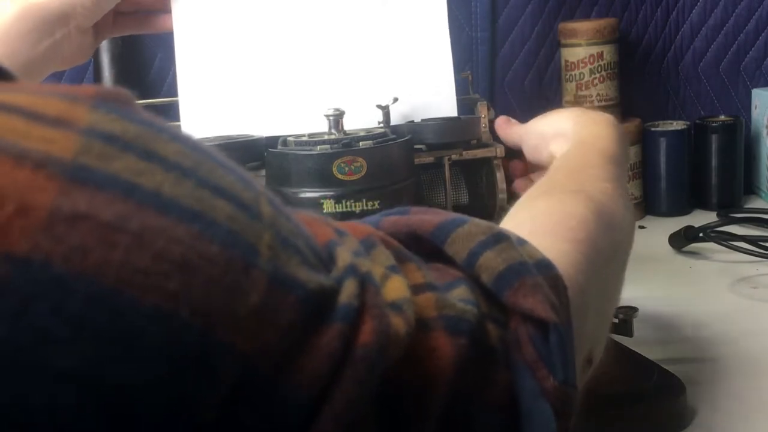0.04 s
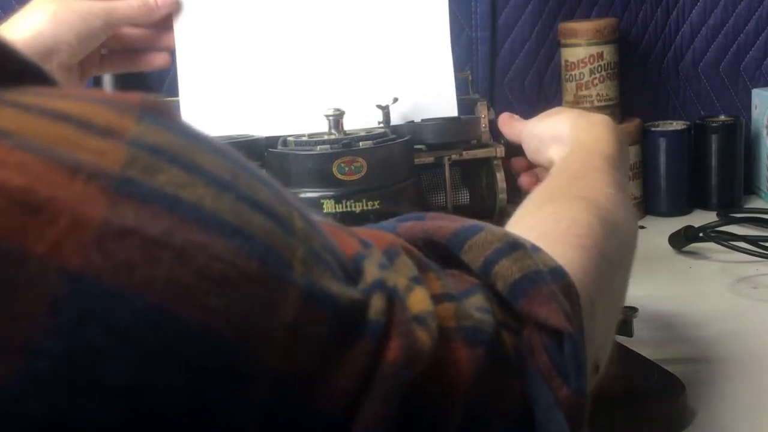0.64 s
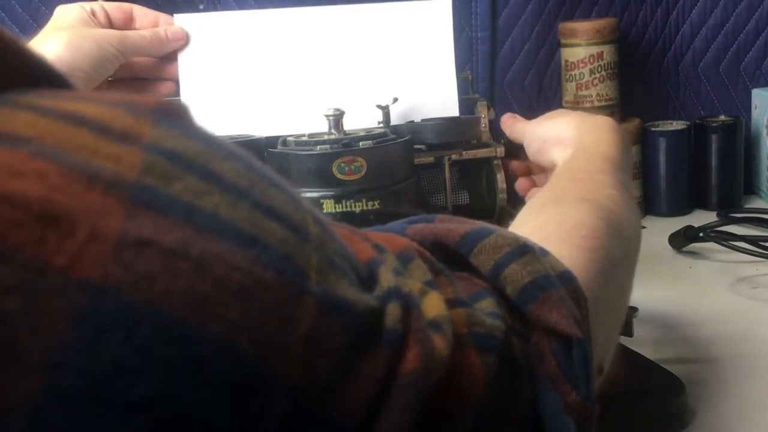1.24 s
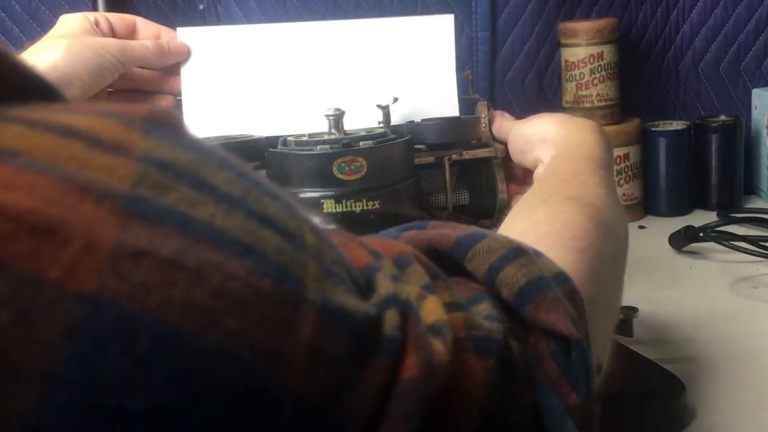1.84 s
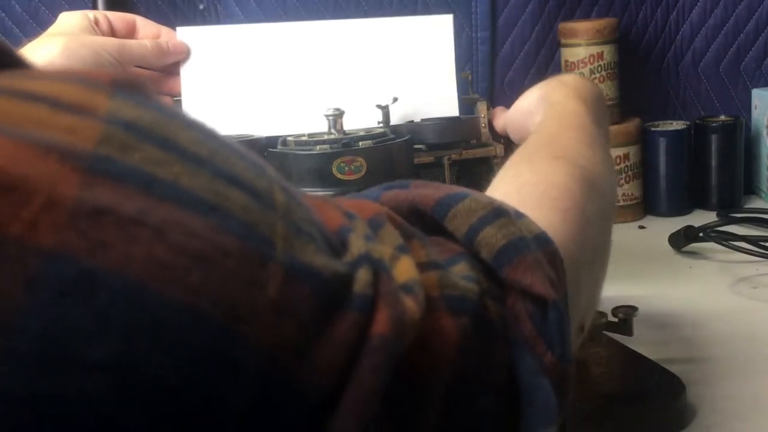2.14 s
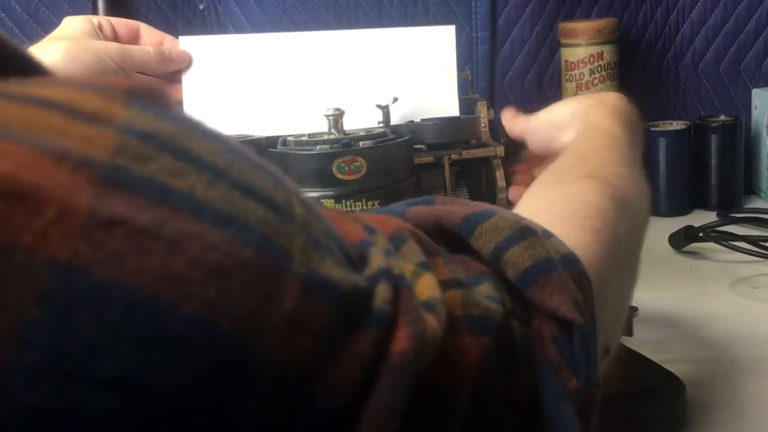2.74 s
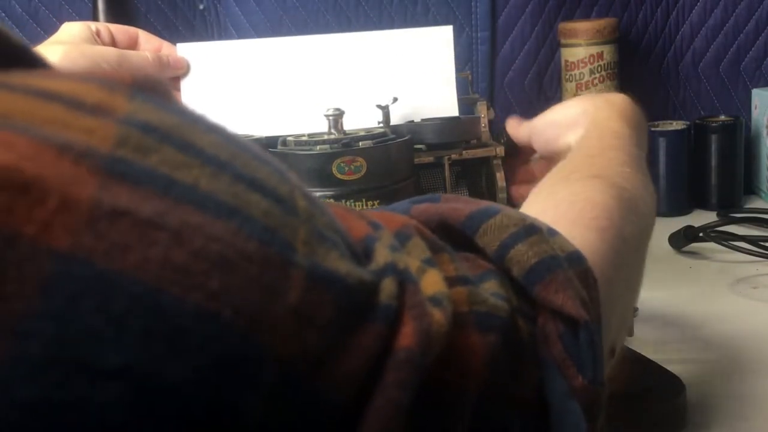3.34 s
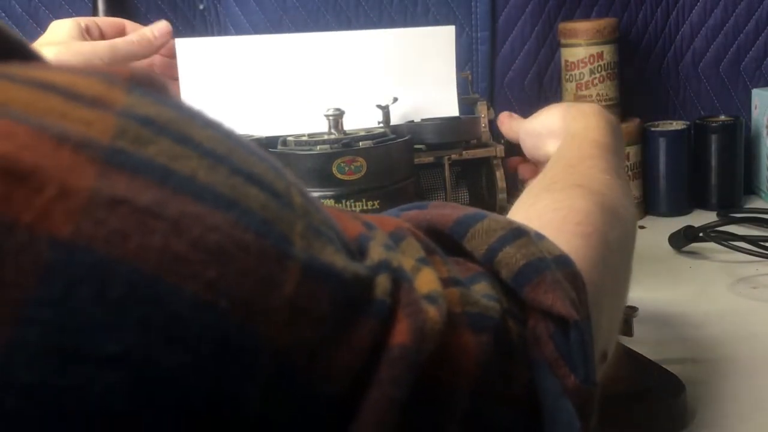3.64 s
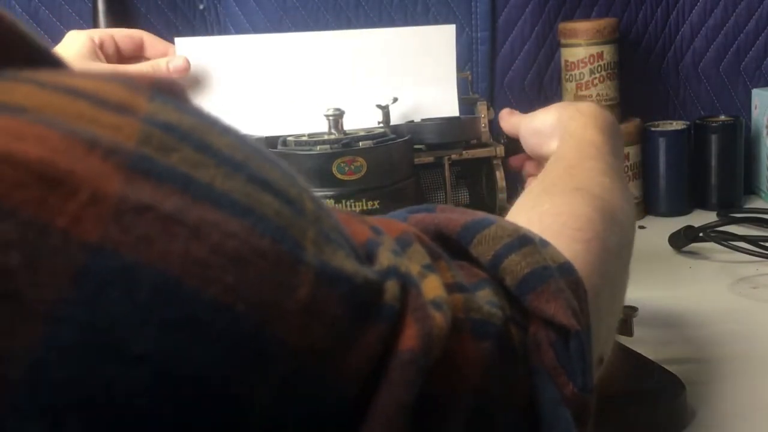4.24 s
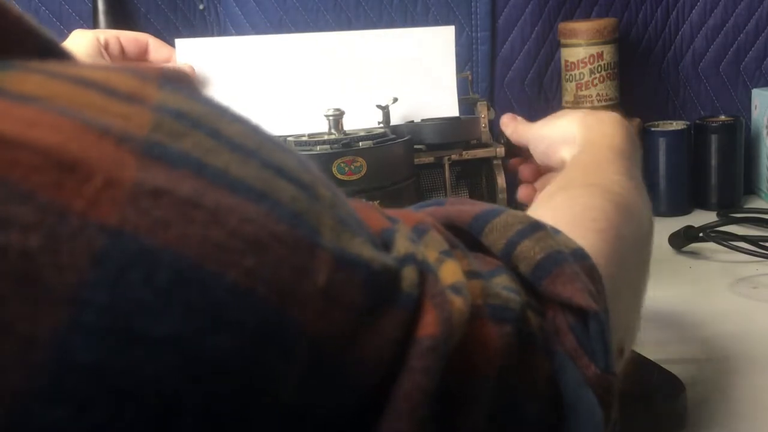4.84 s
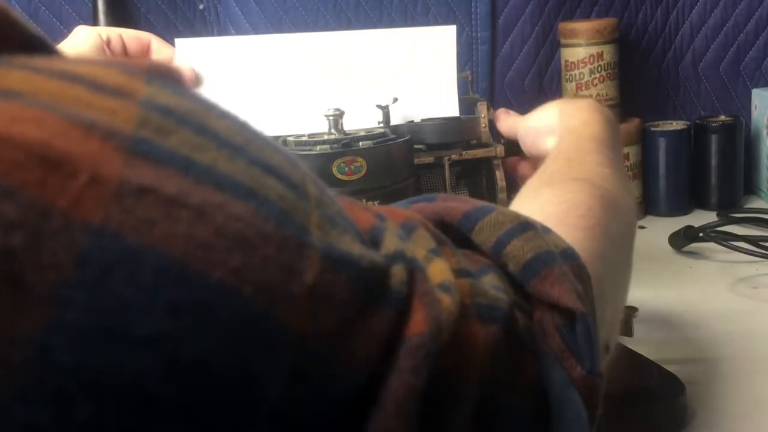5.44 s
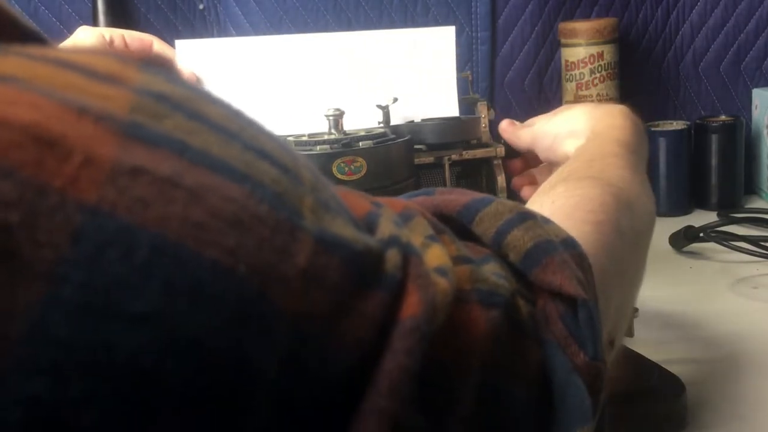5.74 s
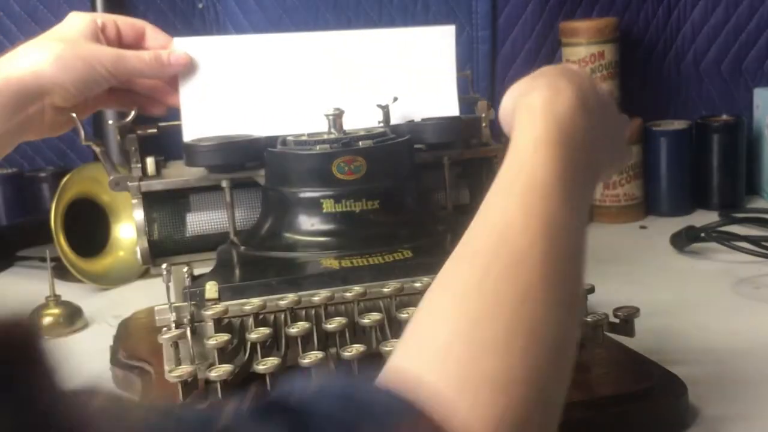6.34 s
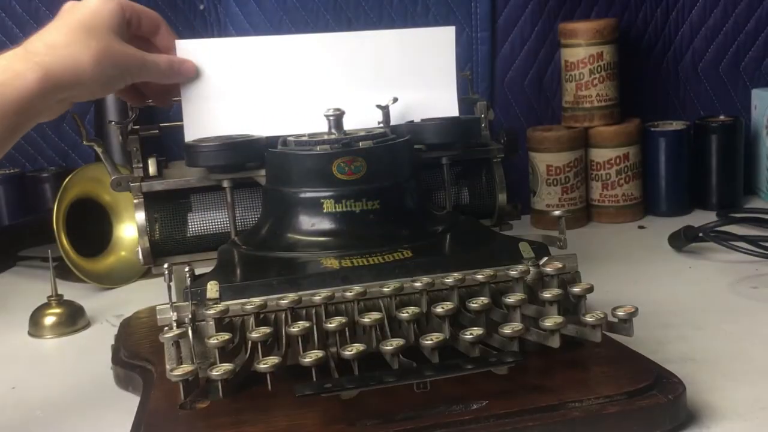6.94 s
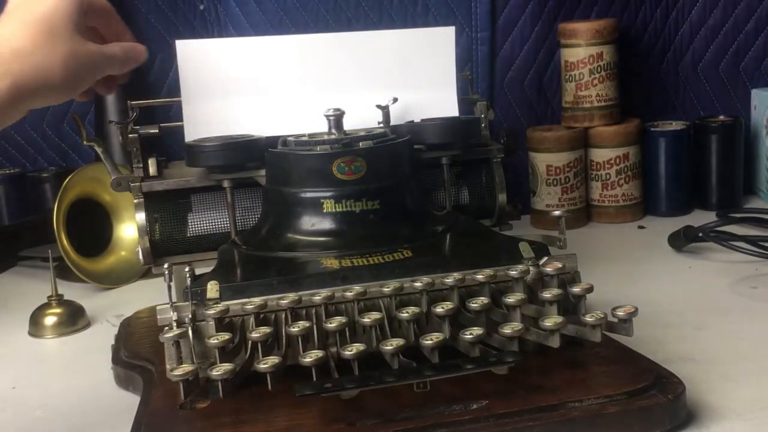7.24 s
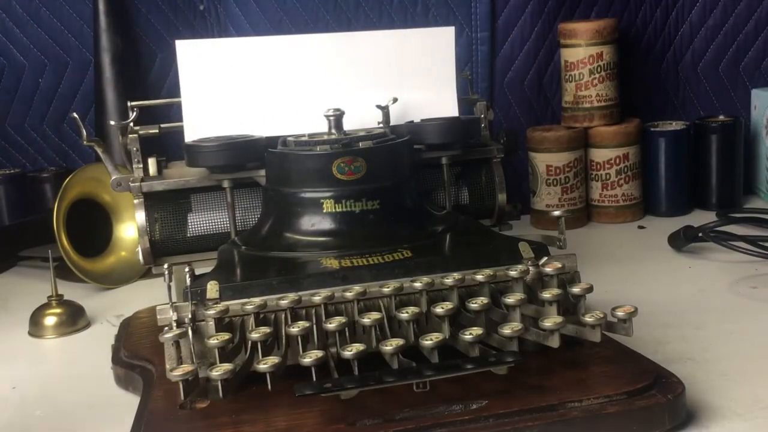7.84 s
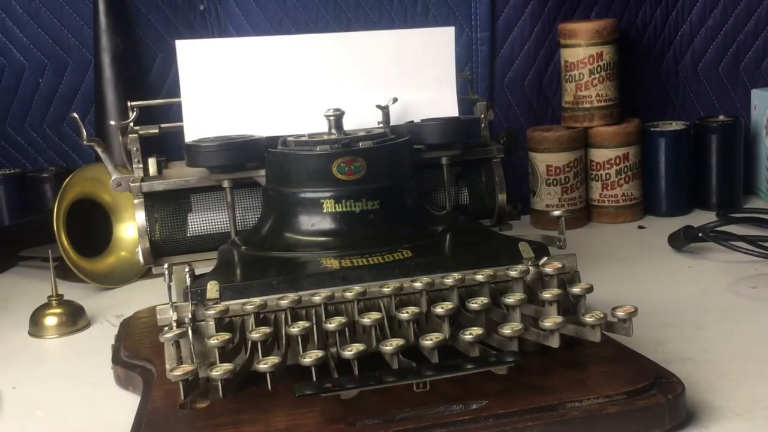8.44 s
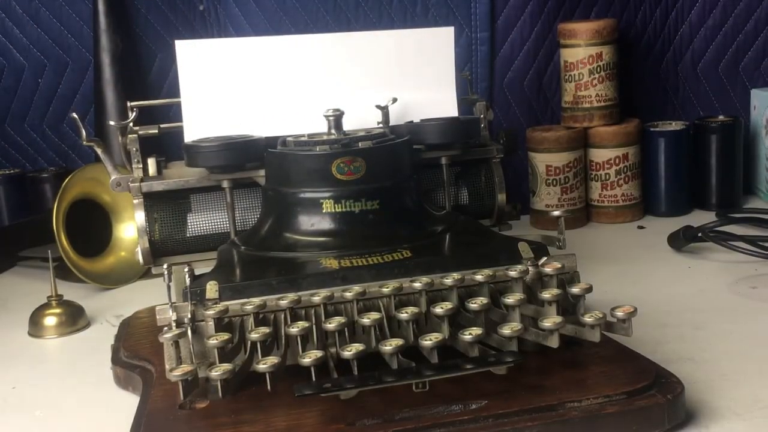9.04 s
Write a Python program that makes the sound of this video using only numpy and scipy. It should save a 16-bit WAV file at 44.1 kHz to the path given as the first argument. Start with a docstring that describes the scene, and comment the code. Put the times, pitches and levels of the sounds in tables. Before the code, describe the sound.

A hand winds paper into an old typewriter with short twists of the roller knob. Each twist gives a quick run of ratchet clicks, a little paper scrape and clacks from the loose metal carriage. After about six seconds the turning stops, fingers slide softly off the sheet, and a few dull table bumps, a small click and a tiny squeak follow. The sound is close, in a small padded room with faint hiss.

```python
"""Winding paper into a typewriter

In a small padded room a hand feeds a sheet into an old typewriter with short twists of the platen knob.
The sprung detent scrapes up each ratchet tooth and snaps down, the platen rumbles and the loose carriage
clacks: friction and impacts excite the resonances of metal parts, frame and wooden base. Afterwards
fingers slide off the paper, a sleeve swishes, something bumps the table and there is one tiny squeak."""
import sys
import numpy as np
from scipy import signal
from scipy.fft import rfft, irfft, next_fast_len
from scipy.io import wavfile
from scipy.ndimage import uniform_filter1d, map_coordinates

SR = 44100
rng = np.random.default_rng(int(sys.argv[2]) if len(sys.argv) > 2 else 0)


def digitize_waveform(pressure):
    """Quantize a signal to 16-bit integers and store it at the path in sys.argv[1].

    Rows of a 2-D input are taken as channels; values are limited to [-1, 1].
    """
    field = np.atleast_2d(pressure).T
    bounded = np.clip(field, -1, 1)
    quanta = np.round(bounded * 32767).astype(np.int16)
    wavfile.write(sys.argv[1], SR, quanta)


N = 404838
LET_GO_S = 6.1  # the hand leaves the knob

# Twists of the knob. Each row: start and end in seconds, then relative levels in dB of the rolling,
# the paper scrape, the wooden base and the detent's ping (higher when it drops freely).
TWISTS = [(0.0, 0.151, -46.5, -48, -53, 6.5), (0.542, 0.84, -54.5, -55.5, -58, 16),
          (1.214, 1.41, -49.5, -53, -52.5, 10.5), (1.816, 1.905, -42.5, -49.5, -43, 2.5),
          (2.399, 2.627, -47, -57, -49, 2), (3.044, 3.28, -44.5, -54, -50, 0.5),
          (3.679, 3.906, -46.5, -54.5, -72, 3.5), (4.564, 4.64, -42, -49.5, -52, -10),
          (4.79, 5.096, -44.5, -53, -54, 2.5), (5.517, 5.686, -49.5, -54, -63, 3.5),
          (5.755, 5.89, -52, -61, -65, 4.5)]
# Spectrum of scraping contact. Each row: frequency in Hz, relative level in dB.
SCRAPE = [(600, -8.5), (1200, 6), (2000, 6.5), (3300, 4), (4100, 2.5), (5300, 3), (7200, -1), (8700, -0.5),
          (10000, -3.5), (12000, -7), (16000, -11.5)]
# Resonances of the machine. Each row: frequency in Hz, bandwidth in Hz, relative level in dB.
FRAME_MODES = [(220, 130, -9.5), (350, 35, -7.5), (450, 61, -2.5), (624, 44, -5), (706, 54, -14),
               (758, 99, 5), (872, 92, 3), (970, 86, 0.5), (1124, 86, 2), (1330, 52, 0.5), (1420, 44, -4.5),
               (1720, 98, -6.5), (1990, 30, -10), (2070, 33, -4.5), (2210, 120, -8), (2560, 28, -14),
               (3250, 54, -10)]  # carriage frame
LINK_MODES = [(1326, 105, 1.5), (1597, 50, 4), (1873, 70, 1.5), (2060, 92, 5), (2290, 92, 1.5),
              (2610, 66, 0), (3130, 145, -1.5), (3570, 420, -8), (4550, 150, -3.5), (5400, 260, -9.5),
              (5800, 160, -11), (6400, 180, -20)]  # loose metal links
BASE_MODES = [(206.6, 36, 2), (259, 27, -1), (327, 64, -5.5), (452, 54, -10.5)]  # wooden base


def amp(db):
    """Amplitude ratio of a level in decibels."""
    return 10 ** (np.asarray(db) / 20)


def unit(x):
    """Normalisation to an rms of 1."""
    return x / np.sqrt(np.mean(np.abs(x) ** 2) + 1e-20)


def along(points, hz):
    """Interpolation of (Hz, value) points on a logarithmic frequency axis."""
    frequencies, values = np.transpose(points)
    return np.interp(np.log(hz + 1), np.log(frequencies + 1), values)


def curves(rows):
    """Linear interpolation in time: one curve for each column after the first."""
    times, *columns = np.transpose(rows)
    return [np.interp(np.arange(N) / SR, times, column) for column in columns]


def during(rows):
    """A soft-edged gate over the time that a table covers."""
    t = np.arange(N) / SR
    return uniform_filter1d(1.0 * ((t >= rows[0][0]) & (t <= rows[-1][0])), size=1500)


def turning():
    """One soft-edged gate for each twist of the knob."""
    t = np.arange(N) / SR
    start, end, *_ = np.transpose(TWISTS)
    return uniform_filter1d(1.0 * ((t >= start[:, None]) & (t < end[:, None])), size=600)


def wobble(rate):
    """Random modulation: a spline through rate knots a second."""
    return map_coordinates(rng.standard_normal(int(N * rate / SR) + 4), [np.arange(N) * rate / SR])


def coloured(x, gain):
    """Minimum-phase filtering: folding the cepstrum makes gain(hz) a causal filter of unit power."""
    size = 32768
    magnitude = unit(gain(np.fft.rfftfreq(size, 1 / SR)))
    cepstrum = irfft(np.log(np.maximum(magnitude, 1e-6)))
    cepstrum[1:size // 2] *= 2
    cepstrum[size // 2 + 1:] = 0
    response = irfft(np.exp(rfft(cepstrum)))[:size // 2]
    return signal.oaconvolve(x, response)[:N]


def shaped(x, spectrum):
    """Spectral shaping by an envelope of (Hz, dB) points."""
    return coloured(x, lambda hz: amp(along(spectrum, hz)))


def resonant(force, modes, broad_db):
    """Forced vibration: (Hz, bandwidth, dB) resonances add in power to the wooden base's broad response."""
    # Broad response of the wood. Each row: frequency in Hz, relative level in dB.
    board = [(60, -38), (150, 1), (450, 6.5), (800, 8), (1300, 4.5), (2500, -37), (4000, -34),
             (9000, -17.5), (16000, -26)]

    def gain(hz):
        peaks = sum(amp(db) ** 2 / (1 + ((centre ** 2 - hz ** 2) / (hz * width + 1)) ** 2)
                    for centre, width, db in modes)
        broad = amp(broad_db + along(board, hz)) ** 2
        return np.sqrt(peaks / (1 + (hz / 9000) ** 2) + broad)
    return coloured(force, gain)


def grit(rate, grain_db):
    """Friction as shot noise: rate micro-impacts a second, of uneven size, with an rms of 1."""
    hits = rng.random(N) < rate / SR
    return unit(hits * rng.choice([-1, 1], N) * amp(grain_db * rng.standard_normal(N)))


def chatter(times, levels_db, rise, t60, rate):
    """Rough contact: bursts of rate micro-impacts a second swell 60 dB in rise seconds and die in t60."""
    lead = SR // 4
    power = np.zeros(N + SR)
    t = np.arange(-lead, SR // 2) / SR
    burst = amp(-60 * np.where(t < 0, -t / rise, t / t60)) ** 2
    for start, db in zip(times, levels_db):
        power[round(start * SR):][:len(t)] += amp(db) ** 2 * burst
    count = int(N * rate / SR)
    hits = np.unique(((np.arange(count) + rng.random(count)) * N / count).astype(int))
    # each impact releases the energy gathered since the one before
    energy = np.diff(np.cumsum(power[lead:])[hits], prepend=0)
    force = np.zeros(N)
    force[hits] = np.sqrt(np.abs(energy)) * rng.choice([-1, 1], len(hits))
    return force


def strike(times, levels_db, gap_s, count, bounce_db=-2):
    """Inelastic rebound: each impact is followed by ever weaker ones, to and fro at uneven gaps."""
    force, order = np.zeros(N + SR), np.arange(count)
    for start, db in zip(times, levels_db):
        gaps = gap_s * (0.5 + rng.random(count)) * (order > 0)
        hits = np.round((start + np.cumsum(gaps)) * SR).astype(int)
        force[hits] += (-1) ** order * amp(db + bounce_db * order)
    return force[:N]


def background():
    """The noise floor: broadband room noise with a faint mains hum."""
    # Room noise. Each row: frequency in Hz, relative level in dB.
    air = [(13, -40), (22, -17), (34, -13.5), (56, 0), (92, -8.5), (128, -3.5), (270, -18.5), (328, -12.5),
           (444, -21.5), (554, -23.5), (710, -25.5), (771, -18.5), (885, -26), (5770, -35.5),
           (16000, -40.5)]
    hum = amp(-67) * np.sin(2 * np.pi * 120 * np.arange(N) / SR)
    return hum + amp(-62 + 0.99 * wobble(13)) * shaped(rng.standard_normal(N), air)


def sleeve():
    """Friction of cloth on cloth makes one swell of noise as the arm draws back."""
    # Cloth noise. Each row: frequency in Hz, relative level in dB.
    cloth = [(300, -25), (2000, -9), (6000, -2), (9000, 2), (15000, -5)]
    peak_s, rise_s, fall_s = 6.68, 0.5, 0.2
    t = np.arange(N) / SR - peak_s
    swell = np.exp(-(t / np.where(t < 0, rise_s, fall_s)) ** 2)
    return amp(-72.5) * swell * shaped(rng.standard_normal(N), cloth)


def squeak():
    """A thin gliding tone, roughened by random frequency modulation."""
    # Course of the squeak. Each row: time in seconds, pitch in Hz, level in dB.
    glide = [(9.09, 5300, -84), (9.125, 5800, -60), (9.145, 5000, -72), (9.178, 5650, -66)]
    hz, db = curves(glide)
    phase = 2 * np.pi * np.cumsum(hz * (1 + 0.0083 * wobble(500))) / SR
    return during(glide) * amp(db) * np.sin(phase)


def table_bumps():
    """Soft impacts excite mainly the lowest modes of the table."""
    # Bumps. Each row: time in seconds, relative level in dB, pitch in Hz.
    bumps = [(7.489, -32.5, 72), (8.239, -28, 81), (8.939, -34.5, 48)]
    # Their spectrum. Each row: multiple of the pitch, relative level in dB.
    thump = np.array([(.35, -11), (.7, -7), (1, -1), (1.5, -11.5), (2.4, -20.5), (5.5, -31.5),
                      (21, -54), (110, -95)])
    return sum(shaped(chatter([time], [db - 10.5], rise=0.059, t60=0.32, rate=2000), thump * [hz, 1])
               for time, db, hz in bumps)


def tap():
    """A small hard object clicks and settles by rebounds as the table is bumped."""
    # The click. Its row: time in seconds, relative level in dB.
    click = [(8.2589, -43.5)]
    # The object's resonances. Each row: frequency in Hz, bandwidth in Hz, relative level in dB.
    modes = [(1400, 290, -8), (1990, 150, 2.5), (2760, 300, -2), (3520, 310, -2.5), (4200, 290, -15),
             (6400, 440, -17)]
    times, db = np.transpose(click)
    hit = strike(times, db + 20, gap_s=0.0007, count=6)
    settling = chatter(times + 0.0011, db - 1, rise=0.002, t60=0.057, rate=4000)
    return resonant(hit + settling, modes, broad_db=-21)


def dry_ticks():
    """Broadband transients heard as thin dry ticks: the sheet flicking, and one at the squeak's peak."""
    # Ticks. Each row: time in seconds, relative level in dB.
    ticks = [(3.3443, -53), (3.492, -54.5), (7.048, -45), (9.1234, -55)]
    times, db = np.transpose(ticks)
    return shaped(chatter(times, db, rise=0.0009, t60=0.019, rate=4400), SCRAPE)


def paper():
    """Sliding friction of fingertips on the sheet."""
    # Course of the slide. Each row: time in seconds, relative level in dB.
    rub = [(6.1, -83), (6.124, -81), (6.4, -69.5), (6.698, -67), (6.806, -59), (7.092, -61.5), (7.172, -86),
           (7.25, -89)]
    # Rubbed paper. Each row: frequency in Hz, relative level in dB.
    spectrum = [(150, -12), (250, 0.5), (354, -4.5), (597, -7), (748, -10.5), (1530, -14), (1980, -5),
                (2910, -15), (4900, -19), (6940, -18.5), (7840, -27), (9330, -25), (14900, -36),
                (16000, -41)]
    rub_db, = curves(rub)
    envelope = during(rub) * amp(rub_db + 2.5 + 1.6 * wobble(25))
    return envelope * shaped(grit(rate=7000, grain_db=3), spectrum)


def hand_knocks():
    """Soft contact excites a few low, hollow resonances as the hand shifts."""
    # Knocks. Each row: time in seconds, relative level in dB.
    knocks = [(2.131, -48), (4.0278, -48), (6.1574, -55)]
    # Their resonances. Each row: frequency in Hz, bandwidth in Hz, relative level in dB.
    modes = [(787, 54, -1), (900, 60, 0.5), (1130, 80, -10)]
    times, db = np.transpose(knocks)
    return resonant(chatter(times + 0.0029, db, rise=0.0096, t60=0.046, rate=3000), modes, broad_db=-24)


def table_rumble():
    """Forced vibration: the table trembles under the grip; a stronger shake lags behind each twist."""
    # The trembling table. Each row: frequency in Hz, relative level in dB.
    spectrum = [(15, -50), (25, -7), (38, -2), (59, 8), (98, 0), (133, 4.5), (177, -9), (257, -5.5),
                (300, -12), (390, -39), (660, -120)]
    lag_s, shake_per_roll = 0.055, 0.35  # the shake gains this many dB per dB of rolling
    decay = np.exp(-1 / (lag_s * SR))
    roll_db = np.transpose(TWISTS)[2]
    effort = amp(shake_per_roll * (roll_db - roll_db.mean())) @ turning()
    shake = amp(-51) * signal.lfilter([1 - decay], [1, -decay], effort)
    grip = (np.arange(N) / SR < LET_GO_S) * amp(-61.5 + 1.4 * wobble(10))
    return (shake + uniform_filter1d(grip, size=2000)) * shaped(rng.standard_normal(N), spectrum)


def platen():
    """Rolling friction: rubber on paper and dry bearings drive the frame and base; the sheet scrapes."""
    _, _, roll_db, scrape_db, base_db, _ = np.transpose(TWISTS)
    roll, scrape, press = amp([roll_db - 1.5, scrape_db - 0.5, base_db]) @ turning()
    bearings = amp(1.9 * wobble(70)) * resonant(grit(rate=2500, grain_db=1.5), FRAME_MODES, broad_db=-33)
    fibres = grit(rate=9000, grain_db=4)
    sheet = amp(2.3 * wobble(90)) * shaped(fibres, SCRAPE)
    wood = resonant(grit(rate=1500, grain_db=2), BASE_MODES, broad_db=-22)
    return roll * bearings + scrape * sheet + press * wood


def rattles(count):
    """Faint random impacts while the hand holds the knob, as rows like the carriage's clacks."""
    when, metal, knock = rng.random((count, 3)).T
    levels_db = -62.5 + 3 * (2 * np.array([metal, knock]) - 1)
    return np.column_stack([when * LET_GO_S, *levels_db])


def carriage():
    """Backlash: play is taken up in impacts that sound a tick, the links, then the frame and its base."""
    # Clacks. Each row: time in seconds, relative levels in dB of the metal links and the frame knock.
    clacks = [(.2635, -50, -47.5), (.3045, -36, -61), (.5117, -29.5, -45), (.5603, -22.5, -43),
              (1.1618, -29.5, -49.5), (1.5342, -60, -47.5), (1.8028, -35, -43), (1.86, -30, -40),
              (1.913, -32, -48), (1.9328, -44, -36), (1.9835, -38.5, -39), (2.181, -57, -49),
              (2.235, -61, -49.5), (2.3368, -39, -51), (2.4015, -39, -38.5), (2.4454, -27, -33),
              (2.4857, -32, -33.5), (2.5258, -29, -42), (2.6747, -29.5, -58), (2.697, -56, -46),
              (2.721, -34.5, -49.5), (2.9052, -46, -51), (2.9733, -46, -50), (2.9963, -36.5, -44),
              (3.0794, -30, -55), (3.123, -28, -40.5), (3.1632, -33, -36), (3.6303, -32.5, -46.5),
              (3.7076, -28, -45), (3.7497, -26.5, -46), (3.7934, -26, -43.5), (3.8376, -28, -46),
              (3.8965, -29, -56), (3.9496, -30, -49.5), (4.3788, -43, -54.5), (4.561, -32, -31.5),
              (4.6068, -35, -33), (4.7732, -28.5, -49), (4.789, -28, -29.5), (4.9326, -25.5, -52),
              (4.9694, -27.5, -46), (5.4094, -53, -55.5), (5.4884, -32.5, -47.5), (5.66, -31, -43),
              (5.9112, -37.5, -42), (7.4284, -64, -59.5), (8.2026, -65, -58)]
    times, metal_db, knock_db = np.vstack([clacks, rattles(count=20)]).T
    tick_db = knock_db + 0.28 * (metal_db - knock_db) - 6.5
    tick = shaped(chatter(times, tick_db, rise=0.0009, t60=0.015, rate=4400), SCRAPE)
    link_force = chatter(times + 0.00044, metal_db - 13, rise=0.0021, t60=0.091, rate=3000)
    frame_force = chatter(times + 0.0049, knock_db, rise=0.025, t60=0.062, rate=3000)
    base_force = chatter(times + 0.0064, knock_db - 6.5, rise=0.0039, t60=0.097, rate=1500)
    clink = resonant(link_force, LINK_MODES, broad_db=-21.5)
    knock = resonant(frame_force, FRAME_MODES, broad_db=-7.5)
    thud = resonant(base_force, BASE_MODES, broad_db=-21)
    return tick + clink + knock + thud


def spring(times, levels_db, scatter_db):
    """Free vibration: each drop rings the detent spring's damped modes with new strengths and phases."""
    # Spring modes. Each row: frequency in Hz, relative level in dB, 60 dB decay time in seconds.
    modes = [(2556, 8, 0.09), (2660, 10, 0.12), (2780, -8, 0.068), (2820, -2.5, 0.16), (3000, 0, 0.087),
             (5470, -4, 0.059)]
    hz, mode_db, t60 = np.transpose(modes)[:, :, None]
    ring, t = np.zeros(N + SR), np.arange(SR // 4) / SR
    for start, db in zip(times, levels_db):
        envelopes = amp(db + mode_db + scatter_db * rng.standard_normal(hz.shape) - 60 * t / t60)
        partials = envelopes * np.sin(2 * np.pi * (hz * t + rng.random(hz.shape)))
        ring[round(start * SR):][:len(t)] += partials.sum(0)
    return ring[:N]


def ratchet():
    """Friction, then impact: the detent climbs a tooth and snaps down, exciting spring, frame and links."""
    # Drops into a gap. Each row: time in seconds, relative levels in dB of the click and frame knock.
    teeth = [(0.031, -44, -47), (0.0529, -44, -41.5), (0.09, -55, -40), (0.1029, -44.5, -40),
             (0.1355, -47.5, -46), (0.1461, -43, -41), (.573, -49, -36), (.605, -51, -47),
             (0.6367, -53, -38), (0.6735, -54, -40), (0.7149, -52, -40.5), (.7623, -52, -44.5),
             (0.8132, -53.5, -40.5), (1.2182, -48, -44.5), (1.2539, -48.5, -51), (1.3, -49.5, -45),
             (1.3446, -48.5, -37), (1.3949, -48.5, -35), (1.8431, -43.5, -42), (1.8852, -47, -49),
             (2.4209, -42, -38), (2.466, -44, -37), (2.506, -46.5, -37), (2.5594, -53, -52),
             (2.591, -51, -40), (2.608, -51, -38), (3.0551, -44, -30), (3.0946, -51, -46),
             (3.1442, -51, -56), (3.1804, -42.5, -34.5), (3.2099, -47, -46), (3.24, -50, -37.5),
             (3.6913, -53, -47), (3.734, -52, -47), (3.774, -51.5, -50), (3.821, -56.5, -43),
             (3.877, -54, -40), (4.5746, -48, -43), (4.6285, -44.5, -42), (4.7985, -42, -33.5),
             (4.827, -50, -48), (4.8585, -51, -47), (4.8896, -52, -40), (4.919, -50.5, -48),
             (4.953, -51, -40), (4.9902, -51.5, -42), (5.0188, -51.5, -44), (5.0418, -50.5, -42),
             (5.0559, -50, -51), (5.0811, -51.5, -48), (5.5248, -53, -40), (5.571, -55, -41),
             (5.605, -56.5, -39.5), (5.6452, -52, -37.5), (5.7462, -53, -41), (5.813, -53, -49),
             (5.836, -56, -45)]
    # The detent's resonances. Each row: frequency in Hz, bandwidth in Hz, relative level in dB.
    detent_modes = [(2330, 230, -2.5), (2747, 64, 5.5), (3500, 180, -10), (4800, 110, -6.5),
                    (5514, 170, 2.5), (6220, 160, -7), (6900, 170, -10), (8920, 540, -15)]
    times, click_db, knock_db = np.transpose(teeth)
    start, end, *_, free_db = np.transpose(TWISTS)
    nearest_twist = np.argmin(np.abs(times[:, None] - (start + end) / 2), axis=1)
    ping_db = click_db + free_db[nearest_twist]
    climb = chatter(times - 0.002, click_db + 8, rise=0.044, t60=0.051, rate=12000)
    snap = strike(times, click_db + 25.5, gap_s=0.0005, count=7)
    drop = strike(times + 0.0003, ping_db + 22, gap_s=0.0006, count=7)
    ping = resonant(drop, detent_modes, broad_db=-33)
    frame_force = chatter(times + 0.003, knock_db, rise=0.014, t60=0.061, rate=3000)
    knock = resonant(frame_force, FRAME_MODES, broad_db=-5.5)
    jingle_db = knock_db - 6 - 0.29 * free_db[nearest_twist]  # a free drop shakes the links less
    link_force = chatter(times + 0.0021, jingle_db, rise=0.0036, t60=0.068, rate=3000)
    jingle = resonant(link_force, LINK_MODES, broad_db=-18)
    burrs = unit(amp(3.6 * rng.standard_normal(N)))  # the tooth face is uneven
    click = shaped(burrs * climb + snap, SCRAPE)
    # only a free, hard drop leaves the spring ringing; a dragged one damps it
    ring_db = ping_db - 14.5 + 0.6 * (ping_db - ping_db.max())
    return click + ping + knock + jingle + spring(times, ring_db, scatter_db=2.5)


def room(x, wet_db, wall_db, wall_delay_s):
    """Reverberation: an early reflection from the wall behind the machine, then a short diffuse tail."""
    # Decay of the room. Each row: frequency in Hz, 60 dB decay time in seconds.
    decay_times = [(150, 0.21), (400, 0.35), (1000, 0.15), (2800, 0.17), (7300, 0.069), (15000, 0.095)]
    hz, t, noise = signal.stft(rng.standard_normal(SR // 2), SR, nperseg=256)
    tail = signal.istft(noise * amp(-60 * t / along(decay_times, hz)[:, None]), SR, nperseg=256)[1]
    response = amp(wet_db) * tail / np.linalg.norm(tail)
    response[0] += amp(wall_db)
    return signal.fftconvolve(np.pad(x, (round(wall_delay_s * SR), 0)), response)[:N]


def scene():
    """Superposition of direct sound, reflections, table bumps and room noise in one channel."""
    direct = ratchet() + carriage() + hand_knocks() + platen() + table_rumble()
    direct += paper() + dry_ticks() + sleeve() + tap() + squeak()
    reflections = room(direct, wet_db=-10.5, wall_db=-19, wall_delay_s=0.0075)
    return (direct + reflections + table_bumps() + background())[None]


def record(dry):
    """The microphone's frequency response: a bass roll-off, a treble dip from its port, a band limit."""
    dip_hz, dip_width_hz, dip_db = 10380, 300, -5
    low_cut_hz, top_hz = 34, 15900
    size = next_fast_len(N + SR // 2)
    hz = np.fft.rfftfreq(size, 1 / SR)
    port = amp(dip_db * np.exp(-((hz - dip_hz) / dip_width_hz) ** 2))
    high_pass = hz ** 3 / np.hypot(hz ** 3, low_cut_hz ** 3)
    return irfft(rfft(dry, size) * port * high_pass * (hz < top_hz), size)[..., :N]


dry = scene()
out = record(dry)
digitize_waveform(out)
```